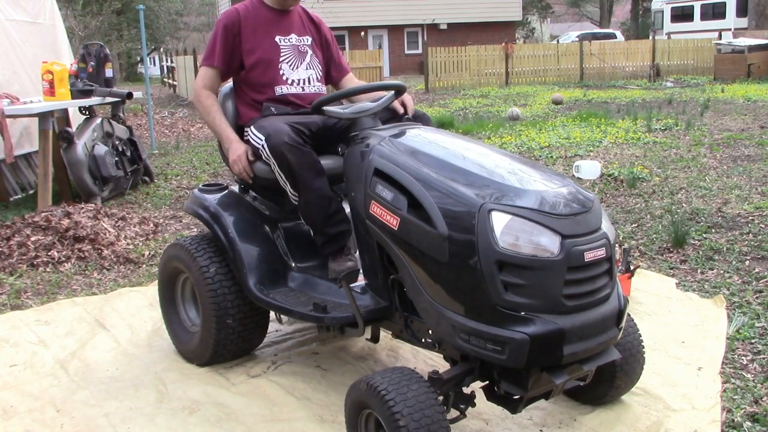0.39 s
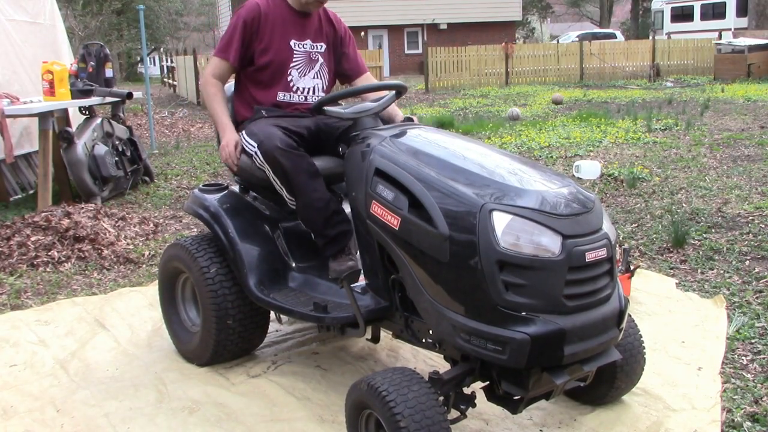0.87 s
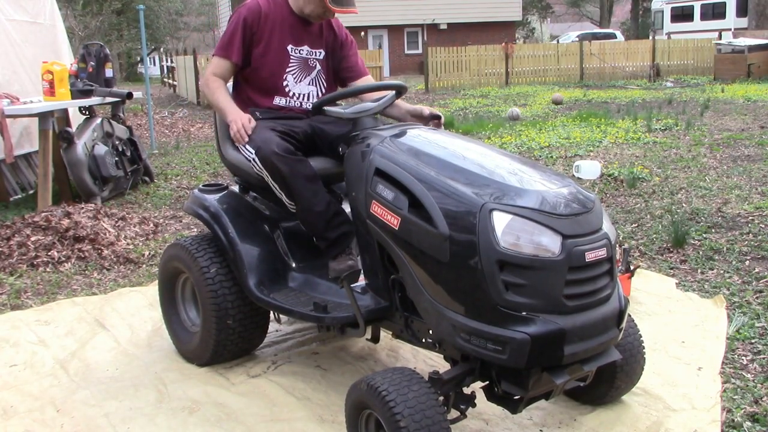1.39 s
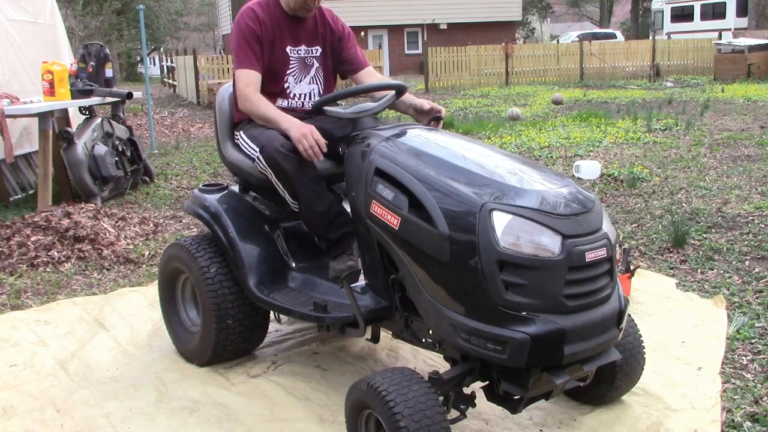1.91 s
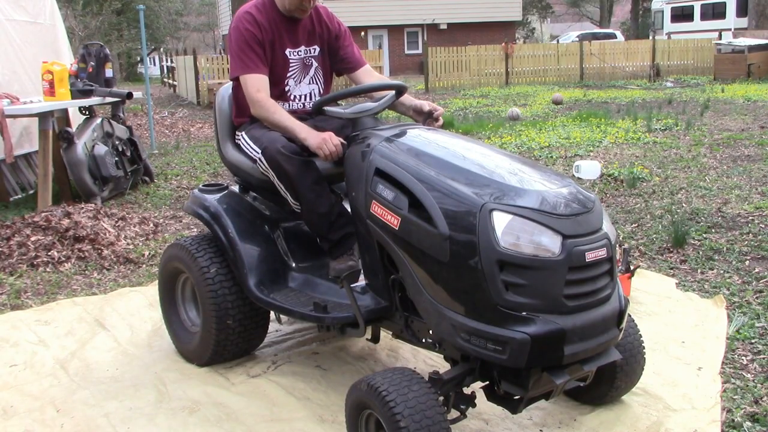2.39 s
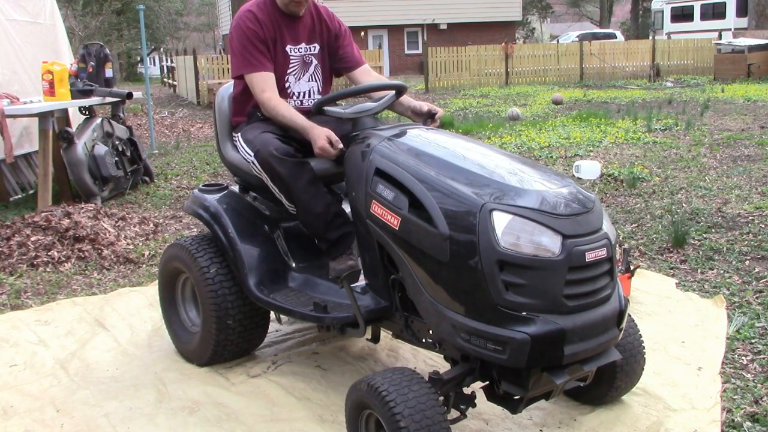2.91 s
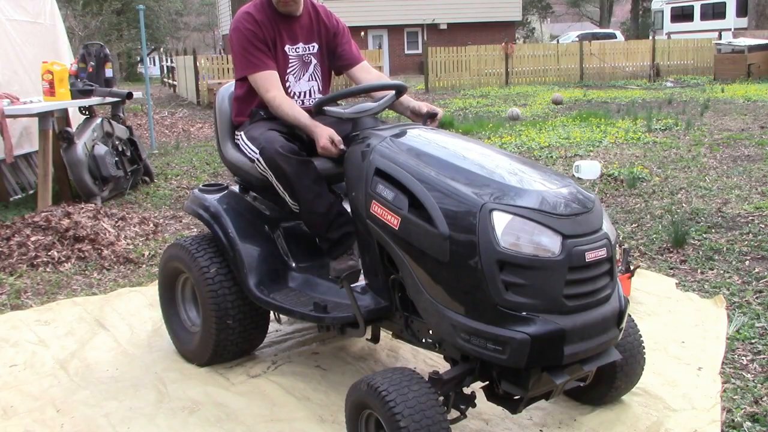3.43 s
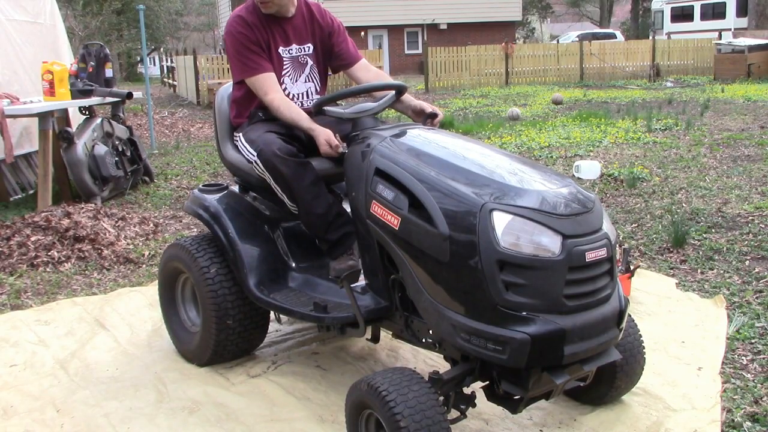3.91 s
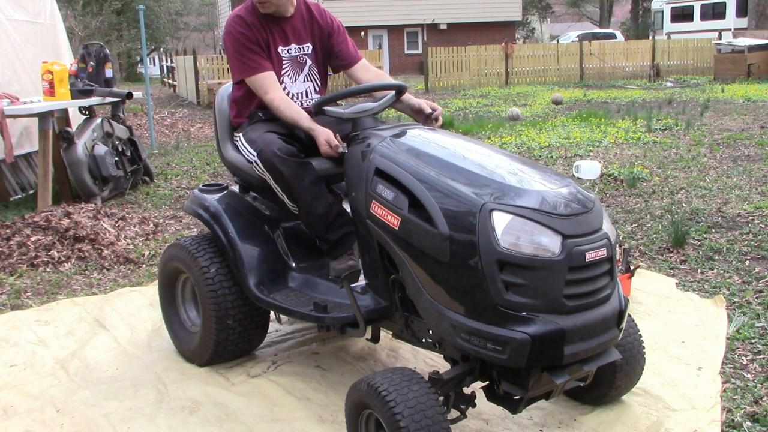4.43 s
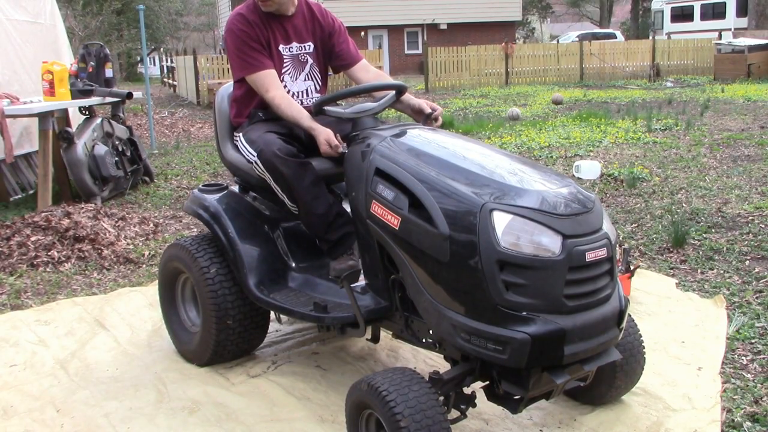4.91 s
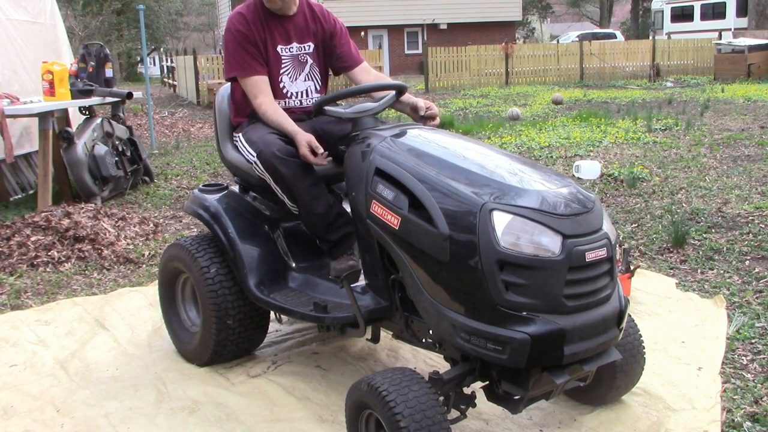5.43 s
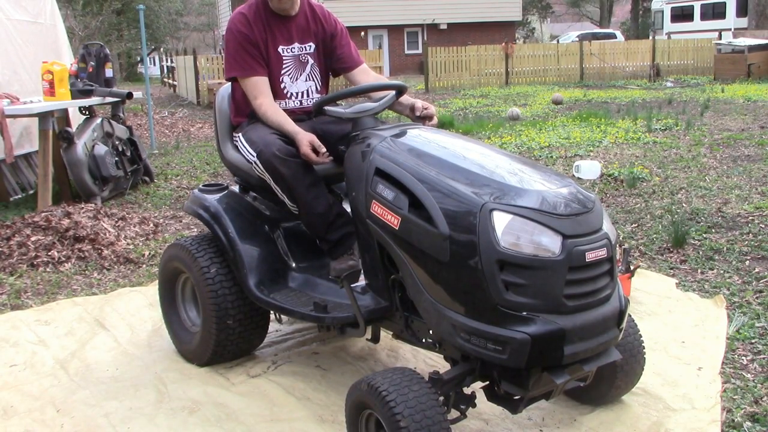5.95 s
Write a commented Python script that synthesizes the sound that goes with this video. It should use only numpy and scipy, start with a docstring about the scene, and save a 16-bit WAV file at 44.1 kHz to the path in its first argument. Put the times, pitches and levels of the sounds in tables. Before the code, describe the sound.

A few dull thumps and clicks in a quiet yard with birds, then an electric starter grinds for a second before a rough twin-cylinder tractor engine fires and runs.

```python
"""Lawn tractor starting in a quiet yard

Seat and lever blows ring metal modes under noisy cracks; the solenoid clacks the same way. The starter's tooth
tone, grinding noise and ringing flywheel bite hardest at each compression. A two-cylinder four-stroke then
catches and revs up with a few misses: pulses ring the muffler over gas hiss, clatter and whine.
Gliding birds, a wavering insect line, rustling cloth and filtered-noise traffic fill the yard."""
import sys
import numpy as np
from scipy import signal
from scipy.fft import rfft, irfft
from scipy.io import wavfile
from scipy.ndimage import uniform_filter1d, map_coordinates

SR = 44100
rng = np.random.default_rng(int(sys.argv[2]) if len(sys.argv) > 2 else 0)


def amplitude_ratio(level_db):
    """Convert a level in decibels to the matching linear amplitude (field) ratio."""
    exponent = np.asarray(level_db, float) / 20
    return 10 ** exponent


def output_pcm(signal):
    """Save a mono or channel-first signal as 16-bit PCM at the path in sys.argv[1].

    Samples are clipped to [-1, 1] before scaling.
    """
    pcm = np.clip(np.atleast_2d(signal).T, -1, 1) * 32767
    wavfile.write(sys.argv[1], SR, np.round(pcm).astype(np.int16))


N = 267687
T = np.arange(N) / SR

# Engine speed: (time [s], four-stroke cycles per second [Hz])
ENGINE_SPEED = [(4.74, 7.74), (4.83, 10.12), (4.92, 14.43), (5.02, 20.33), (5.12, 24.54), (5.22, 26.17),
                (5.4, 26.99), (5.6, 26.61), (5.8, 25.99), (6.07, 25.87)]
# Misses of the first cylinder: (time [s], level change [dB])
MISSES = [(5.565, -18), (5.641, -4), (5.679, -9), (5.755, -18), (5.831, -5), (5.908, -8), (5.986, -7)]
# Muffler resonances: (frequency [Hz], relative level [dB], t60 [s])
MUFFLER_MODES = [(128.5, 0, 0.044), (179.5, 6.5, 0.046), (224.5, -3, 0.094), (298, -7.5, 0.039),
                 (337.6, -13, 0.056), (429.6, -6, 0.087), (529.3, -13.5, 0.28), (960, -28, 0.027),
                 (1770, -15, .08), (2000, -34, 0.076)]
# Spectrum of valve gear and fan clatter: (frequency [Hz], relative level [dB per Hz])
CLATTER_SPECTRUM = [(60, -19), (150, -13), (300, -5), (550, 0), (1000, -2), (1950, -7), (2250, -12.5),
                    (3500, -16), (4800, -21), (7000, -21), (8500, -26), (11000, -37), (15900, -52)]
# Spectrum of the spat exhaust gas: (frequency [Hz], relative level [dB per Hz])
HISS_SPECTRUM = [(600, 9), (2000, 11.5), (4500, 6.5), (7000, 11.5), (9500, 2.5), (13000, -8), (16000, -15)]
# Fan and gear whine: (tones per cycle [1], level under full clatter [dB])
FAN_TONES = [(70, -30), (75, -28)]
BLOW_LEAD_S = .0052  # a blowdown comes this long before the trough of its thump
TWIN_GAP = .38  # the first cylinder blows this share of a cycle before the second
COLD_DB, WARM_DB, WARMS_S = -5.5, -1, (5.0, 5.25)  # the first cylinder is weak until it warms up
EXHAUST_PEAK_DB = -0.5
SPIT_DB, SPIT_DB_PER_HZ = -19.5, -0.87  # hiss at 26 cycles a second; slower firings spit harder
CLATTER_DB, CLATTER_FULL_S, CLATTER_RISE_DB_PER_S = -14.2, 4.955, 64

# Starter between bites: (time [s], grind level [dB], whine level [dB])
STARTER_LEVELS = [(3.56, -7, -16.5), (3.62, -43.5, -18), (3.69, -26.5, -21), (3.76, -24, -11.5),
                  (3.9, -22.5, -21.5), (4.75, -21, -28), (4.84, -26, -21)]
# Loose bites as the pinion engages, spins up and is kicked out: (time [s], whine level [dB], rattle level [dB])
LOOSE_BITES = [(3.627, -4, -21.5), (3.659, 0, -34), (3.698, -15, -25), (3.739, -4, -16), (3.84, -10, -30),
               (3.886, -3, -20), (3.931, 2, -22), (4.746, -24, -13.5)]
# Hardest bites, a piston against compression: (time [s], whine level [dB], rattle level [dB])
COMPRESSIONS = [(3.778, 1.5, -38), (4.006, 4, -13), (4.193, -3, -7.5), (4.372, 0.5, -16), (4.546, -2, -15),
                (4.71, -8, -11)]
# Lesser bites between later compressions: (share of the cycle [1], whine level [dB], rattle level [dB])
LESSER_BITES = [(.29, -3.5, -18.5), (.51, -16, -19), (.62, -2.5, -17.5), (.89, -4, -23)]
# Pinion spin-up: (time [s], tooth rate between compressions [Hz])
TOOTH_RATE = [(3.56, 330), (3.625, 455.2), (3.685, 488.5), (3.735, 791.5), (3.8, 860), (3.87, 1046),
              (4.0, 1133), (4.08, 1286), (4.43, 1451), (4.84, 1540)]
# Flywheel resonances: (frequency [Hz], width [Hz], relative level [dB])
FLYWHEEL_MODES = [(1380, 150, -2), (2385, 190, -2), (2964, 130, -10), (3690, 200, -13)]
# Spectrum of the grinding teeth: (frequency [Hz], relative level [dB per Hz])
GRIND_SPECTRUM = [(60, -24), (100, -12.5), (320, -7), (1250, 1), (2100, -4.5), (2700, -9), (4000, -11.5),
                  (5200, -14), (6500, -11.5), (7900, -17), (8400, -18.5), (8900, -22), (9600, -29),
                  (12500, -37.5), (15900, -47)]
# Speed dip at compression: share lost, delay, time constants of slowing and recovery
SAG, SAG_LAG_S, SAG_S, RACE_S = .24, .032, .025, .008
# Past compression the crank runs ahead and the teeth unload
SLACK_DB, SLACK_LAG_S, SLACK_S = -5.5, 0.039, 0.0082

# Blows on the seat: (time [s], thud level [dB], crack level [dB], scrape fade [s])
SEAT_HITS = [(0.004, -25, -45, 0.017), (0.027, -34.5, -43, 0.035), (0.109, -35.5, -54, 0.031),
             (0.237, -33.5, -71, 0.016), (0.411, -20, -21.5, 0.015), (0.431, -21, -47, 0.014),
             (0.451, -32, -29.5, 0.015), (0.469, -32.5, -53, 0.073), (0.569, -38, -49, 0.0088),
             (0.674, -31, -48.5, 0.02), (0.701, -35, -53, 0.015), (0.899, -50, -50, 0.0077),
             (1.039, -35, -46, 0.012), (1.275, -33, -37.5, 0.0085)]
# Blows on the lever: (time [s], thud level [dB], crack level [dB], scrape fade [s])
LEVER_HITS = [(2.11, -48, -52, .004), (2.516, -26, -33, 0.0063), (2.521, -41, -32, 0.0099),
              (2.576, -33, -64, .006), (2.6, -36, -64, 0.0045), (2.663, -29, -42, 0.0036)]
# Blows of the solenoid: (time [s], thud level [dB], crack level [dB], scrape fade [s])
SOLENOID_HITS = [(3.536, -40, -19.5, 0.014), (3.557, -9.5, -14, 0.0042)]
# Seat resonances: (frequency [Hz], relative level [dB], t60 [s])
SEAT_MODES = [(205, -23, 0.1), (317, -11, 0.027), (540, -5.5, 0.014), (730, -6.5, 0.016), (1150, -23, .04),
              (1660, -27, 0.12), (2120, -32, .04), (6540, -25, 0.045), (7500, -26, 0.035),
              (9000, -34, 0.04)]
# Lever resonances: (frequency [Hz], relative level [dB], t60 [s])
LEVER_MODES = [(378, 2.5, 0.054), (628, -11, 0.14), (880, -9, 0.018), (1116, -9.5, 0.067),
               (1390, -1.5, 0.01), (2010, -3, 0.005), (2980, -9, 0.015)]
# Solenoid resonances: (frequency [Hz], relative level [dB], t60 [s])
SOLENOID_MODES = [(328, 1, .16), (800, -10, .06), (1150, -12, .03), (1500, -13, .025), (7210, -26, .02)]
# Spectrum of bright cracks and cloth: (frequency [Hz], relative level [dB per Hz])
CRACK_SPECTRUM = [(1500, 21), (3000, 18), (9000, 12.5), (12000, 1.5), (16000, -30)]

# Cloth rustle: (time [s], level [dB])
RUSTLE_LEVEL = [(0, -64), (1.3, -59), (1.8, -59), (2.0, -65.5), (3.5, -65)]
# Single bird whistles: (time [s], length [s], start pitch [Hz], end pitch [Hz], level [dB])
WHISTLES = [(1.03, .12, 5350, 5300, -66), (1.16, 0.027, 5300, 5250, -54), (1.566, 0.11, 7900, 7200, -56),
            (1.66, 0.14, 7500, 7350, -68)]
# One bird repeats a rising whistle
SONG_START_S, SONG_EVERY_S, SONG_COUNT, SONG_S = 2.13, .307, 5, .18
SONG_FROM_HZ, SONG_TO_HZ, SONG_DB = 2440, 2640, -57
# Insect line: (time [s], level [dB])
INSECT_LEVEL = [(.9, -82), (1.05, -69.5), (3.5, -73)]
INSECT_HZ = 4620
# Spectrum of distant traffic: (frequency [Hz], relative level [dB per Hz])
TRAFFIC_SPECTRUM = [(15, -70), (25, -59), (70, -3), (184, -3.5), (269, -3.5), (501, -11), (958, -8.5),
                    (2330, -19.5), (2600, -23), (2900, -24.5), (4710, -35), (5110, -39), (10000, -55),
                    (15900, -38)]
TRAFFIC_DB = -43.5
# Stereo width of the tractor: (frequency [Hz], side minus mid [dB])
TRACTOR_WIDTH = [(60, -19), (200, -33), (700, -38), (1500, -31), (2400, -25), (3500, -28.5), (6000, -24),
                 (11000, -18), (15000, -14)]
# Stereo width of the surroundings: (frequency [Hz], side minus mid [dB])
YARD_WIDTH = [(60, -40), (300, -22.5), (1500, -20.5), (4000, -14), (12000, -14)]


def unit(x):
    """Scale to rms 1."""
    return x / np.sqrt(np.mean(x ** 2))


def noise():
    """White noise."""
    return rng.standard_normal(N)


def lowpass(x, order, hz):
    """Butterworth filter that dulls sound above hz."""
    return signal.sosfilt(signal.butter(order, hz, fs=SR, output="sos"), x)


def highpass(x, order, hz):
    """Butterworth filter that thins sound below hz."""
    return signal.sosfilt(signal.butter(order, hz, "high", fs=SR, output="sos"), x)


def curve(table):
    """Columns of a time table, joined by straight lines."""
    s, *columns = np.transpose(table)
    return [np.interp(T, s, c) for c in columns]


def colour(x, points):
    """Filter by (Hz, dB) points, joined on a log frequency scale."""
    hz, db = np.transpose(points)
    bins = np.log(np.fft.rfftfreq(N, 1 / SR) + 1)
    return irfft(rfft(x) * amplitude_ratio(np.interp(bins, np.log(hz), db)), N)


def ring(x, modes):
    """Damped sines struck by x."""
    out = 0
    for hz, db, t60 in modes:
        pole = np.exp((2j * np.pi * hz - np.log(1000) / t60) / SR)
        out = out + amplitude_ratio(db) * signal.lfilter([1], [1, -pole], x).imag
    return out


def walk(rate):
    """Smoothed random levels of rms 1, one new target every 1 / rate seconds."""
    k = int(SR / rate)
    held = np.repeat(rng.standard_normal(N // k + 1), k)
    return unit(uniform_filter1d(uniform_filter1d(held, k), k)[:N])


def bursts(s, db, fade_s, rise_s=0.00095):
    """Envelope of events that rise and fade exponentially; no fade is shorter than 2 ms."""
    out = np.zeros(N)
    for start, gain, fade in zip(s, amplitude_ratio(db), np.maximum(fade_s, .002)):
        i = int(start * SR)
        age = T[:min(int(8 * fade * SR), N - i)]
        out[i:i + len(age)] += gain * (1 - np.exp(-age / rise_s)) * np.exp(-age / fade)
    return out


def engine():
    """Two uneven blowdowns a cycle thump the muffler and spit gas; valve gear and fan clatter behind."""
    speed = curve(ENGINE_SPEED)[0]
    cycles = np.cumsum(speed * (T >= ENGINE_SPEED[0][0])) / SR
    count = np.arange(int(cycles[-1]) + 1) + .03  # blowdowns are timed just past each whole cycle
    second = np.interp(count, cycles, T) - BLOW_LEAD_S
    first = np.interp(count[1:] - TWIN_GAP, cycles, T) - BLOW_LEAD_S
    first_db = np.interp(first, WARMS_S, [COLD_DB, WARM_DB])
    for s, loss_db in MISSES:
        first_db[np.argmin(abs(first - s))] += loss_db
    s = np.r_[first, second]
    second_db = -6 * (count < 1)  # the very first firing is feeble
    db = np.r_[first_db, second_db] + 1.0 * rng.standard_normal(len(s))

    # the first cylinder has the longer pipe, so its push is softer
    push_fade = np.r_[0 * first + .003, 0 * second + .002]
    push = bursts(s, db, push_fade, 0.00012)
    thump = ring(highpass(push, 2, 300), MUFFLER_MODES)
    thump = -highpass(thump, 4, 98)  # the thin tailpipe radiates no deep bass
    thump = amplitude_ratio(EXHAUST_PEAK_DB) * thump / np.max(abs(thump))

    # the first cylinder spits the louder, burnt or not
    spit_db = np.r_[0 * first, 0 * second - 3]
    gas = bursts(s, spit_db, 0.017 + 0 * s, 0.0015) * unit(colour(noise(), HISS_SPECTRUM))
    hiss_db = SPIT_DB + SPIT_DB_PER_HZ * (speed - 26)

    # part of the clatter comes back alike on every cycle
    pattern = rng.standard_normal(1700)
    loop = map_coordinates(pattern, [cycles % 1 * 1700], order=1, mode="wrap")
    fresh = noise() * amplitude_ratio(1.8 * walk(90))
    clatter = unit(colour(.7 * loop + fresh, CLATTER_SPECTRUM))
    rise_db = -CLATTER_RISE_DB_PER_S * np.maximum(CLATTER_FULL_S - T, 0)
    turning = cycles > 0
    running = amplitude_ratio(hiss_db) * gas + turning * amplitude_ratio(CLATTER_DB + rise_db) * clatter
    for order, tone_db in FAN_TONES:
        wobble = np.cumsum(.006 * walk(120)) * speed / SR
        tone = np.sin(2 * np.pi * order * (cycles + wobble))
        running += turning * amplitude_ratio(rise_db + tone_db + 4 * walk(50)) * tone
    return thump + running


def starter():
    """Pinion teeth slap the flywheel ring unevenly; each bite whines and rattles louder."""
    grind_db, whine_db = curve(STARTER_LEVELS)
    tops = np.array(COMPRESSIONS)[:, 0]
    # once the crank turns evenly, lesser bites return between compressions
    lesser = [(a + share * (b - a), whine, rattle)
              for a, b in zip(tops[1:], tops[2:]) for share, whine, rattle in LESSER_BITES]
    s, bite_db, rattle_db = np.transpose(LOOSE_BITES + COMPRESSIONS + lesser)
    on = 1. * (T > STARTER_LEVELS[0][0]) * (T < STARTER_LEVELS[-1][0])
    slack = np.exp(-((T - (tops + SLACK_LAG_S)[:, None]) / SLACK_S) ** 2).sum(axis=0)
    on = uniform_filter1d(on, 400) * amplitude_ratio(SLACK_DB * slack)

    late = T - (tops + SAG_LAG_S)[:, None]
    sag = np.exp(-abs(late) / np.where(late < 0, SAG_S, RACE_S)).sum(axis=0)
    teeth_hz = curve(TOOTH_RATE)[0] * (1 - SAG * sag)
    wobble = .045 * np.sqrt(1300 / teeth_hz) * walk(400)  # slow teeth wobble more
    turn = 2 * np.pi * np.cumsum(teeth_hz * (1 + wobble)) / SR
    teeth = np.sin(turn) + .65 * np.sin(2 * turn) + .45 * np.sin(3 * turn)
    # a small gear radiates no bass; the hood dulls its top
    teeth = signal.sosfilt(signal.butter(4, [620, 1900], "band", fs=SR, output="sos"), teeth)
    bite = on * (amplitude_ratio(whine_db) + bursts(s - .004, bite_db, 0.0086 + 0 * s, 0.016))
    whine = bite * amplitude_ratio(3 * walk(220)) * teeth

    rattle = bursts(s, rattle_db, 0.0096 + 0 * s, 0.0025)
    push = on * (amplitude_ratio(grind_db) + rattle) * amplitude_ratio(2.47 * walk(250))
    # a wider resonance dies sooner and is raised to match its width
    modes = [(f, db + 10 * np.log10(w), np.log(1000) / (np.pi * w)) for f, w, db in FLYWHEEL_MODES]
    scale = np.sqrt(np.mean(ring(noise(), modes) ** 2))
    # faster teeth strike the ring harder, up to 1200 Hz
    strike = amplitude_ratio(-12) * push + amplitude_ratio(-6) * bite * np.clip(teeth_hz / 1200, 0, 1) ** 2
    rung = lowpass(ring(strike * noise(), modes) / scale, 2, 5000)
    return whine + push * unit(colour(noise(), GRIND_SPECTRUM)) + rung


def blows(hits, modes):
    """The weight of a blow rings the low modes, its hard edge the high ones; a bright crack rides on top."""
    s, thud_db, crack_db, scrape = np.transpose(hits)
    s = s - .001  # contact begins just before the peak
    edge = bursts(s, crack_db, scrape, 0.00063)
    thud = bursts(s, thud_db, scrape)
    low = ring(thud * noise(), [m for m in modes if m[0] < 850])
    high = ring((amplitude_ratio(12.0) * edge + amplitude_ratio(-25) * thud) * noise(), [m for m in modes if m[0] >= 850])
    body = highpass(low + high, 2, 150)  # the blows carry no deep bass
    return body / np.sqrt(0.0011 * SR) + edge * unit(colour(noise(), CRACK_SPECTRUM))


def cloth():
    """Cloth rustling on the seat: bright noise of fluttering level."""
    return amplitude_ratio(curve(RUSTLE_LEVEL)[0] + 2.5 * walk(30.07)) * unit(colour(noise(), CRACK_SPECTRUM))


def birds():
    """Whistles as single sines whose glide levels off, trembling slightly in pitch and level."""
    out = np.zeros(N)
    song = [(SONG_START_S + k * SONG_EVERY_S, SONG_S, SONG_FROM_HZ, SONG_TO_HZ, SONG_DB)
            for k in range(SONG_COUNT)]
    for s, length, from_hz, to_hz, db in WHISTLES + song:
        u = np.clip((T - s) / length, 0, 1)
        glide = from_hz + (to_hz - from_hz) * (1 - (1 - u) ** 3)
        hz = glide * (1 + 0.0062 * walk(100))
        swell = np.sin(np.pi * u) ** 0.3 * (u < 1)
        out += amplitude_ratio(db + 2.5 * walk(60)) * swell * np.sin(2 * np.pi * np.cumsum(hz) / SR)
    return out


def insect():
    """A thin sine line that wavers in level and, fast and slowly, in pitch."""
    level = amplitude_ratio(curve(INSECT_LEVEL)[0] + 5.4 * walk(60))
    hz = INSECT_HZ * (1 + .004 * walk(200) + 0.0048 * walk(2.5))
    return level * np.sin(2 * np.pi * np.cumsum(hz) / SR)


def traffic():
    """Distant traffic: coloured noise whose bass swells slowly."""
    rumble = unit(colour(noise(), TRAFFIC_SPECTRUM))
    rumble = rumble + (amplitude_ratio(2.0 * walk(11)) - 1) * lowpass(rumble, 2, 450)
    return amplitude_ratio(TRAFFIC_DB) * lowpass(rumble, 2, 9500)  # air dulls the distance


def scatter(x, fade_s, gap_s):
    """Short echoes as a fading noise tail of unit energy, silent for the first gap_s."""
    age = T[:int(.25 * SR)]
    tail = rng.standard_normal(len(age)) * np.exp(-age / fade_s) * (age >= gap_s)
    return signal.fftconvolve(x, tail / np.sqrt(np.sum(tail ** 2)))[:N]


def scene():
    """Tractor with short echoes off fence and shed; left and right hear nearly the same."""
    tractor = engine() + starter()
    tractor = tractor + blows(SEAT_HITS, SEAT_MODES) + blows(LEVER_HITS, LEVER_MODES)
    tractor = tractor + blows(SOLENOID_HITS, SOLENOID_MODES)
    tractor = tractor + amplitude_ratio(-14.5) * scatter(tractor, 0.026, .006)
    mid = tractor + cloth() + birds() + insect() + traffic()
    # echoes that differ left and right
    side = colour(scatter(tractor, 0.015, 0), TRACTOR_WIDTH)
    # the surroundings come from all round, so their side part is drawn afresh
    around = np.roll(birds() + insect(), 40) + cloth() + traffic()
    side = side + colour(around, YARD_WIDTH)
    return np.array([mid + side, mid - side])


def top_cut(x):
    """Nothing passes above the cut-off."""
    return signal.sosfilt(signal.butter(12, 16030, fs=SR, output="sos"), x)


def record(dry):
    """Cuts the deep bass and rounds the loudest peaks."""
    thin = highpass(dry, 2, 60)
    ceiling = 1.05
    mix = ceiling * np.tanh(1.055 * thin / ceiling)
    return top_cut(mix)


dry = scene()
out = record(dry)
output_pcm(out)
```